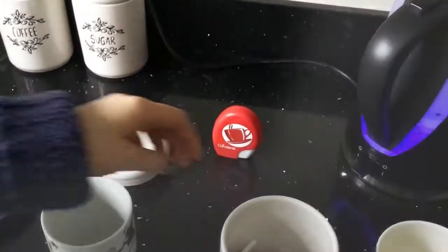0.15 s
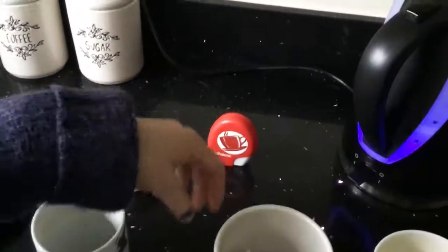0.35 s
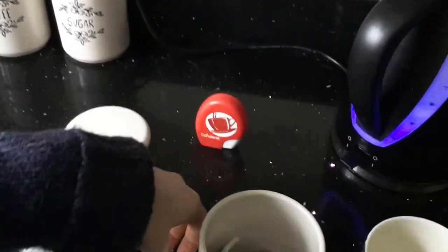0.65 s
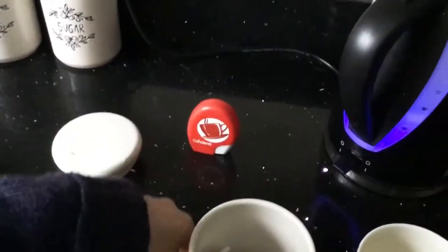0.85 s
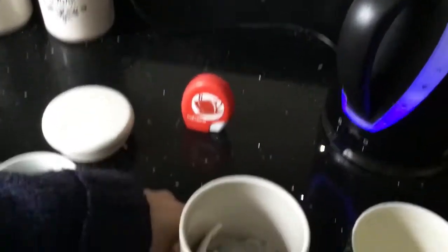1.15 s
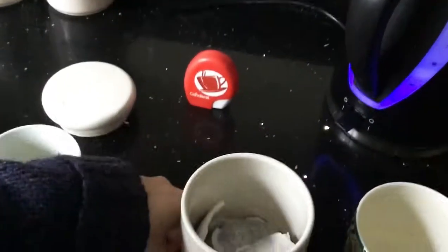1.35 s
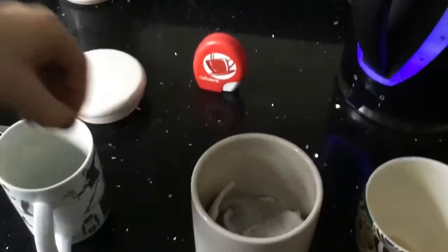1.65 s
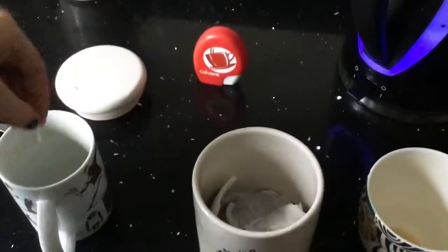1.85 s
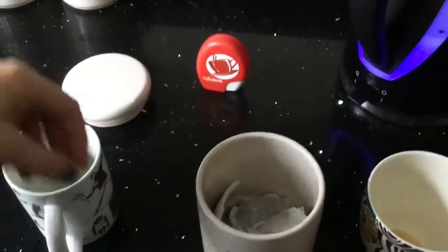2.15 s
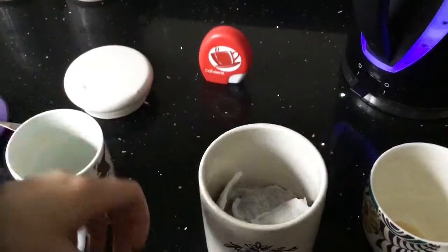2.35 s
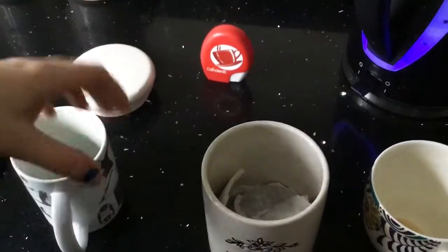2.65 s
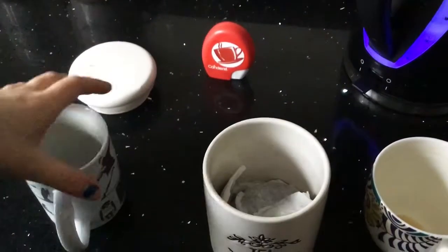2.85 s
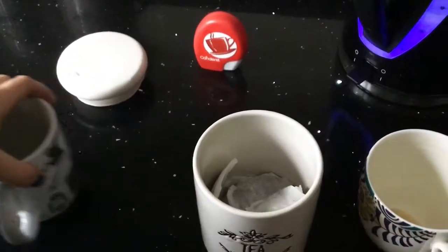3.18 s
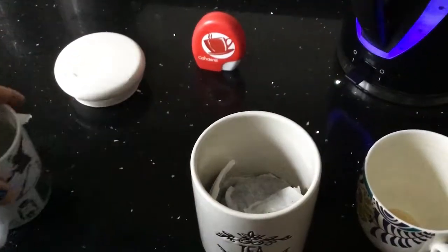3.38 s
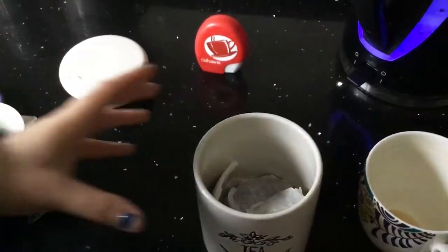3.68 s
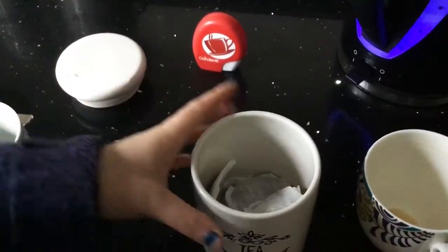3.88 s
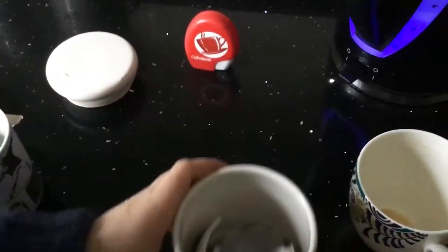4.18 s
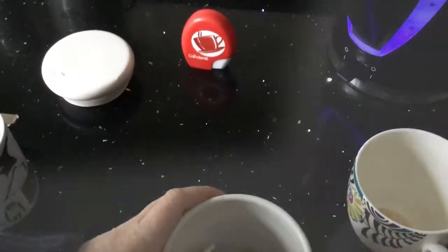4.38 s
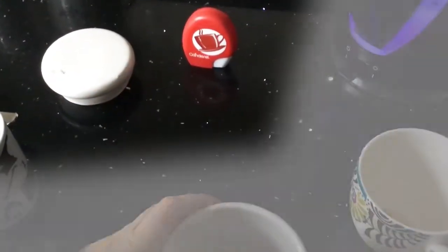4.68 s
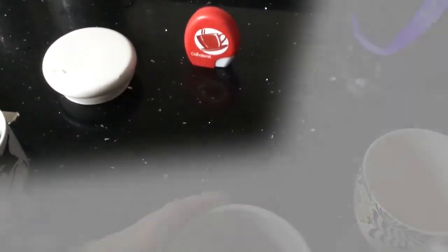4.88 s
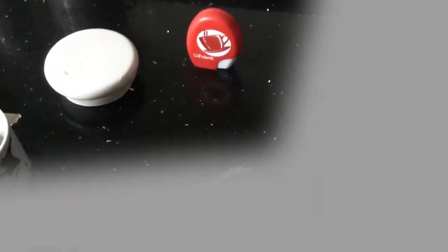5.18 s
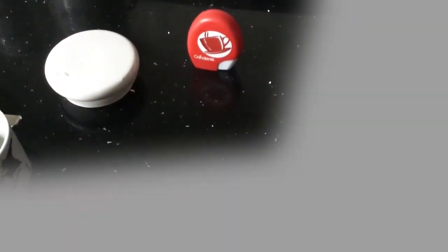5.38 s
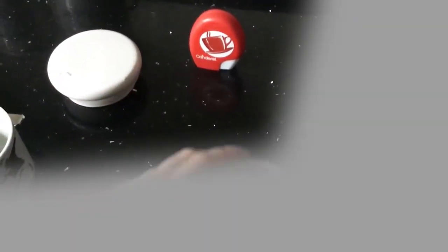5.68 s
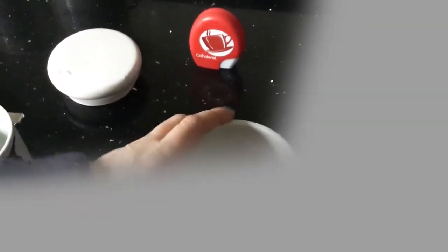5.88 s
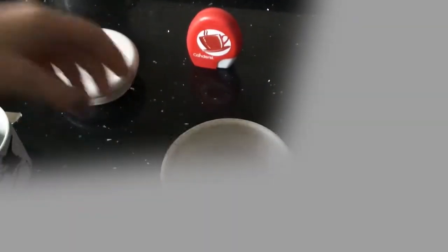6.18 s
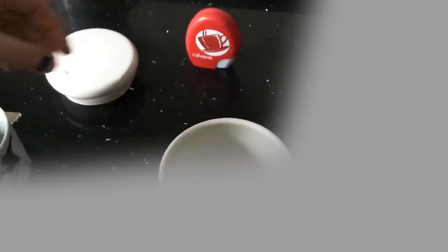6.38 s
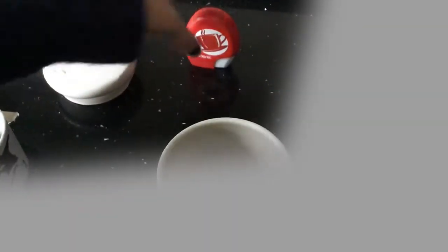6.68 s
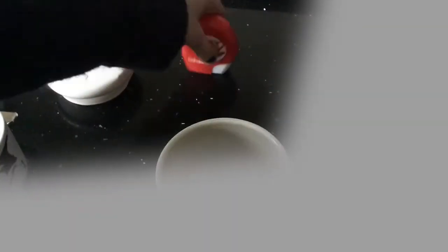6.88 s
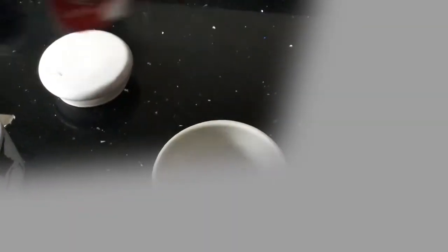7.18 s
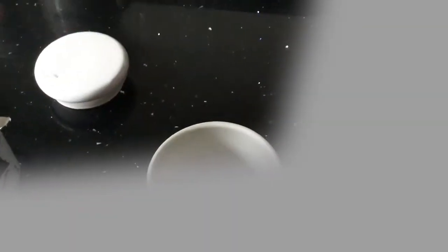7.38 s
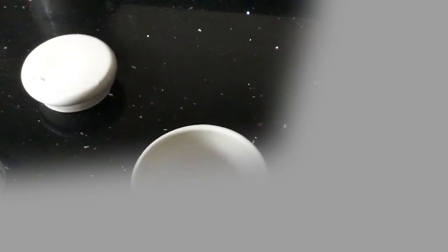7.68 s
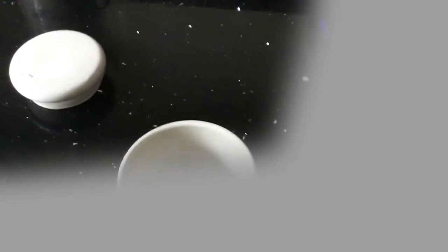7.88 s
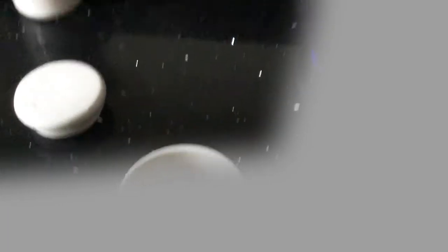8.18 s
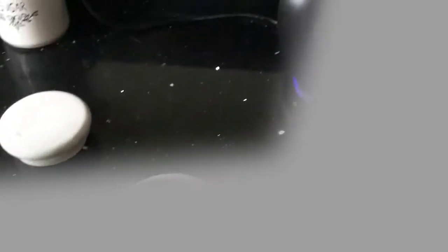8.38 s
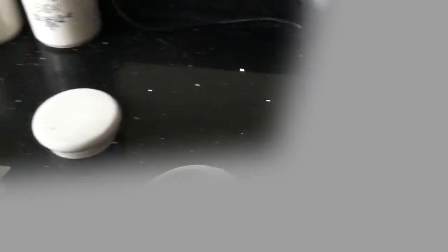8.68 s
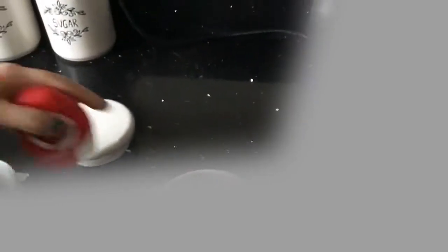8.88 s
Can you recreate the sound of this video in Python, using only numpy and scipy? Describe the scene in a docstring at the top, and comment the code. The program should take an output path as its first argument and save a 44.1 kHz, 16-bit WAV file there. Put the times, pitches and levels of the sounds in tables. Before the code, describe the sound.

Close on a stone kitchen worktop, an electric kettle fizzes and rumbles from the start, over a faint low hum. Light taps and a dull bump come around 0.6-0.8 s, then a rough, rattling ceramic jar knock at 1.3 s and a thin, high mug clink at 2.1 s. From about 2.6 s the bubbling rumble climbs steadily while the hiss fades. At 3.1-3.4 s a mug scrapes over the stone with a faint squeak; at 4.0-4.4 s a heavier jar grates and catches, and again, with a sharper knock, at 5.7-5.9 s. Single low bubble thuds appear from 4.8 s. After 6.2 s come soft finger pats and scuffs; from 6.9 s a hollow plastic dispenser clicks, crackles and rattles in the hand. Small hard clinks ring the mug brightly between 8.0 and 8.6 s, with plastic clicks continuing to about 9 s under the loud rumble. Short room reverberation.

```python
"""Kitchen worktop, with a faint hum: an electric kettle simmers, hisses and rumbles from the start (filtered pops).
Early taps, a bump and a rough jar knock come first, then a light clink on a mug (decaying modes).
The mug, then a ceramic tea jar, scrape over stone (stick-slip grit), as the rumble swells and the hiss fades.
Single low bubble thuds join in (short tones); a plastic dispenser is picked up, rubbed and clicked (resonated noise).
Last, small hard clinks ring the mug among the clicks."""
import sys
import numpy as np
from scipy import signal
from scipy.fft import rfft, irfft
from scipy.io import wavfile

SR = 44100
rng = np.random.default_rng(int(sys.argv[2]) if len(sys.argv) > 2 else 0)


def master(y):
    """Save y as 16-bit WAV."""
    cut = np.clip(np.atleast_2d(y).T, -1, 1)
    pcm = np.round(cut * 32767)  # scale
    wavfile.write(sys.argv[1], SR, pcm.astype(np.int16))


N = 399105
TIME = np.arange(N) / SR


def undb(db):
    """Decibels to gain."""
    return 10 ** (np.asarray(db) / 20)


def unit(x):
    """Scale to rms 1."""
    return x / np.sqrt(np.mean(x ** 2))


def peak_unit(x):
    """Scale to peak 1."""
    return x / np.abs(x).max()


def add(out, start_s, x):
    """Mix x into out at start_s."""
    i = max(int(start_s * SR), 0)
    out[i:i + len(x)] += x[:max(N - i, 0)]


def colour(x, points, size=4096):
    """Minimum-phase filter through (freq_hz, level_db) points."""
    hz, db = np.transpose(points)
    f = np.maximum(np.fft.rfftfreq(size, 1 / SR), 1)
    log_gain = np.log(undb(np.interp(np.log(f), np.log(hz), db)))
    cepstrum = irfft(log_gain)
    # Folding the cepstrum makes the filter causal.
    cepstrum[1:size // 2] *= 2
    cepstrum[size // 2 + 1:] = 0
    impulse = irfft(np.exp(rfft(cepstrum)))
    return signal.fftconvolve(x, impulse)[:len(x)]


def resonate(x, hz, width_hz):
    """Two-pole resonance, gain 1 at the centre."""
    return signal.lfilter(*signal.iirpeak(hz, hz / width_hz, fs=SR), x)


def resonate_twice(x, hz, width_hz):
    """Two equal resonances in series: steeper skirts."""
    return resonate(resonate(x, hz, width_hz), hz, width_hz)


def lowpass(x, order, cutoff_hz):
    """Butterworth low-pass."""
    return signal.sosfilt(signal.butter(order, cutoff_hz, fs=SR, output="sos"), x)


def walk(knots_per_s):
    """Random wander, straight between knots, with a spread near 1."""
    knots = rng.standard_normal(2000)
    return 1.2 * np.interp(TIME * knots_per_s, np.arange(len(knots)), knots)


def pops(rate_per_s, spread_db):
    """Random impulses of uneven size and sign, rms 1."""
    hit = rng.random(N) < rate_per_s / SR
    size = undb(spread_db * np.clip(rng.standard_normal(N), -2, 2))
    return unit(hit * size * rng.choice([-1, 1], N))


def gesture(start_s, length_s, attack_s, release_s):
    """Envelope of one movement: linear rise, hold, exponential decay."""
    rise = np.clip((TIME - start_s) / attack_s, 0, 1)
    return rise * np.exp(-np.clip((TIME - start_s - length_s) / release_s, 0, 20))


def ring(x, modes):
    """A pot's modes driven by x, rms 1; shorter t60 means a wider resonance."""
    return unit(sum(undb(db) * resonate(x, hz, 2.2 / t60_s) for hz, db, t60_s in modes))


def strike(modes, bright_db_per_octave, scatter_db, crack, crack_s):
    """One blow, peak 1: modes of randomly scattered level plus a noise crack through the same modes."""
    t = TIME[:SR // 3]
    hz, db, t60_s = np.transpose(modes)
    tilt_db = bright_db_per_octave * np.log2(hz / hz.mean())
    gain = undb(db + tilt_db + scatter_db * rng.standard_normal(len(hz)))
    onset = 1 - np.exp(-t / (crack_s / 6))  # a longer contact starts the ring more gently
    decaying = np.sin(2 * np.pi * hz[:, None] * t) * undb(-60 * t / t60_s[:, None])
    tones = onset * (gain @ decaying)
    burst = rng.standard_normal(len(t)) * np.exp(-t / crack_s)
    cracks = sum(g * resonate_twice(burst, f, f / 3) for f, g in zip(hz, gain))
    return peak_unit(tones + crack * cracks)


def kitchen(x, wet_db, t60_s=0.28):
    """Tiles and cupboards return a short, decaying noise tail."""
    t = TIME[:SR // 2]
    tail = rng.standard_normal(len(t)) * undb(-60 * t / t60_s) * (1 - np.exp(-t / 0.0011))
    tail = tail / np.sqrt(np.sum(tail ** 2))
    tail = colour(tail, [(200, -9), (2000, 5.0), (6000, -2.0), (15000, -6.5)])
    return x + undb(wet_db) * signal.fftconvolve(x, tail)[:N]


# room noise spectrum: freq_hz, level_db
FLOOR_COLOUR = [(25, -7.5), (40, 20), (60, 33), (120, 33), (500, 7), (3000, -5), (9000, -6), (15500, -19.5)]


def background():
    """A low wavering appliance hum (wandering phase and level) over faint room noise."""
    hum = np.sin(2 * np.pi * 56 * TIME + 0.41 * walk(7.7)) * undb(-68.0 + 1.7 * walk(3.2))
    return hum + unit(colour(rng.standard_normal(N), FLOOR_COLOUR)) * undb(-64.5)


# foot rings squeaking on high pot modes: start_s, length_s, level_db, pitch_hz
SQUEAKS = [(3.108, .11, -75.5, 5790), (3.16, .24, -78, 3375), (3.13, .27, -85, 14200),
           (3.15, .25, -86, 8530), (4.06, .33, -86, 9280), (5.69, .13, -82, 9280)]
SQUEAK_ATTACK_S, SQUEAK_RELEASE_S = 0.04, 0.05


def squeak():
    """Uneven stick-slip gives thin, faltering tones that swell and fade with each push."""
    waver_rad = .8 * walk(55)
    flutter = undb(3 * walk(40))
    tones = 0
    for start_s, length_s, db, hz in SQUEAKS:
        push = gesture(start_s, length_s, SQUEAK_ATTACK_S, SQUEAK_RELEASE_S)
        tones = tones + undb(db) * np.sin(2 * np.pi * hz * TIME + waver_rad) * push
    return flutter * tones


# scrape spectrum: freq_hz, level_db
SCRAPE_COLOUR = [(300, -9), (620, 17), (850, 10), (1080, 11.5), (1450, -10), (1800, -15), (2400, -23),
                 (5000, -42), (15000, -49)]


def slide(modes, sing_db, soft_hz):
    """An unglazed foot ring catches and slips on the stone; the pot's lower modes sing along."""
    grit = pops(700, 4.5) * undb(3 * walk(45))
    singing = ring(lowpass(grit, 6, soft_hz), modes)
    return unit(unit(colour(grit, SCRAPE_COLOUR)) + singing * undb(sing_db))


# pots sliding on stone: start_s, fastest_s, stop_s, reference_db (2.75 dB above fastest), pot
SLIDES = [(3.13, 3.26, 3.40, -51.5, "mug"), (4.06, 4.11, 4.14, -49, "jar"),
          (4.16, 4.24, 4.40, -50.5, "jar"), (5.67, 5.71, 5.76, -56, "jar"), (5.765, 5.79, 5.90, -48, "jar")]
# foot rings catching on the stone: start_s, peak_db
CATCHES = [(3.107, -47), (4.02, -40), (4.098, -39), (4.23, -44.5), (4.273, -46), (4.312, -50), (4.353, -46),
           (5.775, -39.5), (5.7887, -32.5), (5.823, -42), (5.853, -47)]
# jar rocking on its foot ring: freq_hz, level_db, t60_s
FOOT_MODES = [(530, -1, .04), (610, 3, .04), (690, 3, .04), (790, -2, .04), (1025, 4, .1), (1210, -4, .07),
              (1750, -4, .11), (2045, -12, .09), (2355, -18, .08)]
# spectrum of a dull catch: freq_hz, level_db
FOOT_CONTACT_COLOUR = [(300, -10), (550, 5), (1000, -3), (1800, -1), (2600, -9.5), (8000, -37)]
SLIDE_SWELL_DB = 5.5  # rise from first movement to full speed
SLIDE_EDGE_S = .022  # attack and release
CATCH_DECAY_S, CATCH_RING_DB = 0.0088, -3


def slides():
    """Mug, then jar, scrape louder with speed; each catch is a sudden release plus grinding."""
    scrape = {
        "mug": slide(MUG_MODES, sing_db=-21, soft_hz=3400),
        "jar": slide(FOOT_MODES, sing_db=6, soft_hz=2000),
    }
    out, t = np.zeros(N), TIME[:SR // 6]
    for start_s, fastest_s, stop_s, db, pot in SLIDES:
        speed = np.interp(TIME, [start_s, fastest_s, stop_s], [0, 1, 0])
        envelope = gesture(start_s, stop_s - start_s, SLIDE_EDGE_S, SLIDE_EDGE_S)
        out += scrape[pot] * envelope * undb(db - SLIDE_SWELL_DB * (1.5 - speed))
    for start_s, db in CATCHES:
        push = rng.standard_normal(len(t)) * np.exp(-t / CATCH_DECAY_S)
        push[0] += 8  # sudden release ahead of the grinding
        rocking = ring(colour(push, FOOT_CONTACT_COLOUR), FOOT_MODES)
        clunk = unit(colour(push, SCRAPE_COLOUR)) + undb(CATCH_RING_DB) * rocking
        add(out, start_s, undb(db) * peak_unit(clunk))
    return out


# jar knocks: start_s, peak_db, bright_db_per_octave
KNOCKS = [(1.3163, -40, 3.5), (1.3281, -29.5, -7.5), (1.333, -37.5, -5), (3.314, -42, -10.5),
          (3.345, -50, -9), (5.763, -48.5, -9)]
# dull worktop bumps: start_s, level_db, pitch_hz
BUMPS = [(0.8202, -23.5, 270)]
# tea jar: freq_hz, level_db, t60_s
JAR_MODES = [(641, -11, .13), (1030, -18, .06), (1357, -2, .07), (1615, -2, .065), (1830, -6, .04),
             (1950, -8, .04), (2186, -7, .05), (2485, 0, .035), (3070, -10, .05), (3780, 1, .045),
             (4440, -1, .03), (5050, -3, .03), (5640, -4, .035), (6500, -22, .03), (9280, -30, .08),
             (15000, -17, .04)]


def crockery():
    """A rough contact rings the jar's modes; a worktop bump is a low tone under a short swell."""
    out, t = np.zeros(N), TIME[:SR // 10]
    for start_s, db, bright_db in KNOCKS:
        knock = strike(JAR_MODES, bright_db, scatter_db=1.5, crack=4.5, crack_s=.006)
        add(out, start_s, undb(db) * knock)
    swell = t / 0.0031
    for start_s, db, hz in BUMPS:
        add(out, start_s, undb(db) * np.cos(2 * np.pi * hz * t) * (swell * np.exp(1 - swell)) ** 2)
    return out


# jar chattering after a knock: start_s, length_s, level_db
RATTLES = [(1.341, 0.026, -55), (3.325, .035, -67.5)]
# chatter spectrum: freq_hz, level_db
RATTLE_COLOUR = [(900, -29), (1500, 2), (2400, -4), (3000, -1), (3800, -5.5), (5700, -7), (7000, -14),
                 (9000, -18), (11000, -35), (16000, -30)]
RATTLE_ATTACK_S, RATTLE_RELEASE_S, RATTLE_PER_S = 0.011, 0.076, 2200


def rattle():
    """After a knock the foot ring chatters in dense, fading bounces that keep the jar ringing."""
    chatter = unit(colour(pops(RATTLE_PER_S, 2.5), RATTLE_COLOUR))
    chatter = unit(chatter + .45 * ring(chatter, JAR_MODES))
    gain = sum(undb(db) * gesture(start_s, length_s, RATTLE_ATTACK_S, RATTLE_RELEASE_S)
               for start_s, length_s, db in RATTLES)
    return chatter * gain


# light hard blows: start_s, peak_db, middle_modes_db, top_modes_db, ring_share (of t60), click_db (re peak_db)
CLINKS = [(2.06, -31.5, -3, 18, 0.78, -25), (8.0291, -24, 0, -1, 1.02, -1),
          (8.1904, -27, -7, -18, 1.03, -14), (8.2508, -41, -11, -11, 0.91, -9),
          (8.4824, -22, -9, 2, 0.86, -10), (8.527, -31, -10, -14, 0.93, -9), (8.596, -34, -6, 6, 1.06, -14)]
# mug: freq_hz, level_db, t60_s
MUG_MODES = [(3316, -34, .15), (3386, -30, .15), (4480, -35, .06), (4797, -30, .1), (5790, -25, .09),
             (5845, -26, .07), (8511, -12, .22), (8548, 3, .11), (8590, -6, .04), (8695, -2, .18),
             (8870, -19, .08), (9836, -14, .2), (10270, -23, .11), (10912, -14, .1), (12450, -12, .09),
             (12600, -20, .12), (12690, -21, .12), (12955, -21, .13), (14180, -7, .1), (14380, -17, .05),
             (14560, -21, .05)]
# spectrum of the hard contact: freq_hz, level_db
CLICK_COLOUR = [(1500, -17), (5000, -20), (8500, -4), (11000, -17), (15000, -6)]
CLICK_DECAY_S = 0.001


def clinks():
    """Small hard things, a spoon or a tablet, click and ring the mug; each spot favours other modes."""
    out, t = np.zeros(N), TIME[:SR // 10]
    hz, mode_db, t60_s = np.transpose(MUG_MODES)
    middle, top = (hz > 9400) & (hz < 13400), hz > 13400
    for start_s, db, middle_db, top_db, ring_share, click_db in CLINKS:
        spot_db = mode_db + middle_db * middle + top_db * top
        modes = np.transpose([hz, spot_db, t60_s * ring_share])
        add(out, start_s, undb(db) * strike(modes, 0, scatter_db=1, crack=0, crack_s=.001))
        click = colour(rng.standard_normal(len(t)) * np.exp(-t / CLICK_DECAY_S), CLICK_COLOUR)
        add(out, start_s, undb(db + click_db) * peak_unit(click))
    return out


def shifting(x, knots_per_s, depth_db):
    """The contact point moves, so each band comes and goes on its own."""
    centres_hz = np.geomspace(900, 13000, 9)
    bands = (unit(resonate_twice(x, hz, hz / 2)) * np.sqrt(hz) for hz in centres_hz)
    return unit(sum(undb(depth_db * walk(knots_per_s)) * band for band in bands))


def grains(rate_per_s):
    """Tiny catches, each ringing briefly at one of 36 pitches; the rate is per pitch."""
    centres_hz = np.geomspace(1100, 15000, 36)
    bands = (unit(resonate_twice(pops(rate_per_s, 3.5), hz, 200 + hz / 25)) * np.sqrt(hz)
             for hz in centres_hz)
    return unit(sum(bands))


# hollow plastic case: freq_hz, width_hz, doubled_level_db (halved when played)
CASE_MODES = [(1376, 53, 0), (2350, 140, 6.5), (2940, 240, 0), (3780, 110, -10), (4180, 57, -4),
              (4760, 390, -1), (6600, 130, -6)]
CASE_RING_DB = -7


def hollow(x):
    """Friction on the plastic case, coloured by its resonances, rms 1."""
    ringing = sum(undb(db / 2) * resonate(x, hz, width_hz) for hz, width_hz, db in CASE_MODES)
    return unit(unit(x) + undb(CASE_RING_DB) * unit(ringing))


# finger and sleeve strokes: start_s, length_s, scuff_db, crackle_db
STROKES = [(0.6, 0.087, -72, -69), (6.192, 0.074, -68, -81), (6.73, 0.084, -65.5, -88),
           (6.967, 0.071, -70, -58.5), (7.063, 0.13, -64.5, -65), (7.292, 0.047, -72, -68),
           (7.364, 0.12, -64, -66), (7.648, 0.06, -57, -57.5), (7.776, 0.12, -64.5, -62),
           (7.998, 0.046, -60, -69), (8.134, 0.059, -56.5, -57.5), (8.26, 0.073, -61.5, -61.5),
           (8.596, 0.083, -61.5, -73), (8.708, 0.062, -67, -69), (8.812, 0.032, -60.5, -69),
           (8.988, 0.034, -73, -67)]
# dull scuff spectrum: freq_hz, level_db
SCUFF_COLOUR = [(600, -14), (1050, -8.5), (1400, 0), (1750, 5.5), (2250, 3), (2700, -4), (3300, -5),
                (4200, -8), (7000, -28), (16000, -33)]
# bright crackle spectrum: freq_hz, level_db
RUSTLE_COLOUR = [(800, -1.5), (2000, -12), (3400, -10), (4900, -9.5), (5800, -9.5), (7000, -13.5),
                 (9000, -12), (11000, -22), (16000, -17)]
STROKE_ATTACK_S, STROKE_RELEASE_S = 0.013, 0.0054
HELD_FROM_S, GRIP_SCUFF_DB, GRIP_CRACKLE_DB = 6.9, -72.5, -75.5


def rubbing():
    """Fingers scuff the hollow case; sleeve and nails add a bright crackle of tiny catches."""
    drags = shifting(pops(800, 3.5) * undb(1.5 * walk(110)), knots_per_s=60, depth_db=3)
    catches = (grains(rate_per_s=330) + .4 * pops(4000, 3)) * undb(1.8 * walk(120))
    scuff = hollow(colour(drags, SCUFF_COLOUR))
    crackle = hollow(colour(catches, RUSTLE_COLOUR))
    grip = (HELD_FROM_S, TIME[-1] - HELD_FROM_S, GRIP_SCUFF_DB, GRIP_CRACKLE_DB)
    scuff_gain = crackle_gain = 0
    for start_s, length_s, scuff_db, crackle_db in STROKES + [grip]:
        pressure = gesture(start_s, length_s, STROKE_ATTACK_S, STROKE_RELEASE_S)
        scuff_gain = np.maximum(scuff_gain, pressure * undb(scuff_db))
        crackle_gain = np.maximum(crackle_gain, pressure * undb(crackle_db))
    return scuff * scuff_gain + crackle * crackle_gain


# soft fingertip pats: start_s, peak_db, centre_hz
PATS = [(6.206, -53.5, 2640), (6.601, -46, 2060), (6.673, -45.5, 2130), (6.922, -50, 1800),
        (7.378, -50.5, 1650), (7.546, -53, 2450), (7.615, -49.5, 2460), (7.99, -51, 1970),
        (8.365, -51, 2360), (8.471, -47.5, 2320), (8.726, -45, 2370), (8.768, -49, 2130)]
PAT_RISE_S, PAT_WIDTH_HZ = 0.005, 480


def pats():
    """A fingertip lands softly: slow-rising noise, one case resonance and a scuff."""
    out, t = np.zeros(N), TIME[:SR // 10]
    for start_s, db, hz in PATS:
        contact = rng.standard_normal(len(t)) * t * np.exp(-t / PAT_RISE_S)
        case = unit(resonate_twice(contact, hz, PAT_WIDTH_HZ))
        pat = case + undb(2.5) * unit(colour(contact, SCUFF_COLOUR))
        add(out, start_s, undb(db) * peak_unit(pat))
    return out


GRIP_TICK_DB, GRIP_TICK_HZ = -58, 3200  # middle of the random range


def grip_ticks(count):
    """Faint taps of the shifting grip at chance times, strengths and spots: rows like TAPS."""
    held_s = TIME[-1] - HELD_FROM_S
    return [(HELD_FROM_S + when * held_s, GRIP_TICK_DB + 8 * (force - .5),
             GRIP_TICK_HZ * 2 ** (spot - .5), -7)
            for when, force, spot in rng.random((count, 3))]


# plastic clicks and nail taps: start_s, peak_db, centre_hz, snap_db (broadband, re case)
TAPS = [(0.653, -47, 3420, -16), (0.819, -41, 1770, -11), (5.593, -42, 4160, 3), (6.652, -52, 2060, -12),
        (6.8843, -54.5, 3940, 0), (6.9362, -39, 1750, -5), (6.977, -42.5, 1300, -2), (7.0119, -37, 4270, 4),
        (7.028, -49, 3800, -1), (7.0657, -44, 4760, 7), (7.1157, -45, 5600, 2), (7.1414, -39, 3160, 6),
        (7.1748, -41, 2920, 6), (7.2105, -43, 4500, -2), (7.3083, -48, 3420, 6), (7.402, -46, 4400, -7),
        (7.4436, -47, 3400, -7), (7.4549, -40.5, 4340, -9), (7.486, -48, 4430, -3), (7.6589, -48, 1840, -4),
        (7.668, -40, 3400, 17), (7.688, -37.5, 1700, -14), (7.7017, -34, 3530, 2),
        (7.7483, -40.5, 3800, -3), (7.7812, -45, 3180, 2), (8.1514, -49, 4250, 8), (8.1765, -39, 5330, 1),
        (8.195, -41, 2130, 2), (8.2645, -46, 4970, 6), (8.578, -51, 5100, -3), (8.6142, -37, 3700, -2),
        (8.6566, -42.5, 4600, 1), (8.681, -49, 3230, 2), (8.722, -42, 2640, 9), (8.865, -44, 4630, 1),
        (8.98, -51, 4540, -1), (9.0134, -47, 2980, -7), (9.035, -45, 4340, 3)]
# plastic snap spectrum: freq_hz, level_db
PLASTIC_COLOUR = [(400, -8), (1000, 5), (1400, -4), (2400, -1.5), (4800, 5.5), (6500, -3.5), (10000, -6),
                  (16000, -28)]


def dispenser():
    """Plastic snaps die in milliseconds; each spot of the case has its own pitch and few modes."""
    out, t = np.zeros(N), TIME[:SR // 10]
    for start_s, db, hz, snap_db in TAPS + grip_ticks(count=8):
        contact = rng.standard_normal(len(t)) * (np.exp(-t / .0025) + .1 * np.exp(-t / .012))
        detune = 1 + .05 * rng.standard_normal(4)
        modes_hz = np.minimum(hz * np.geomspace(.65, 1.3, 4) * detune, .4 * SR)
        case = sum(resonate_twice(contact, f, 520) for f in modes_hz)
        tap = unit(case) + undb(snap_db) * unit(colour(contact, PLASTIC_COLOUR))
        add(out, start_s, undb(db) * peak_unit(tap))
    return out


# bubble ticks on the kettle wall: centre_hz, width_hz (each of two filters), rate_per_s, level_db
WALL_TICKS = [(2210, 240, 34, -84), (3400, 1500, 5, -89)]


def wall_ticks():
    """Single small bubbles tick against the kettle wall."""
    return sum(undb(db) * unit(resonate_twice(pops(rate_per_s, 2.2), hz, width_hz))
               for hz, width_hz, rate_per_s, db in WALL_TICKS)


# large bubbles collapsing on the hot plate: start_s, level_db, pitch_hz
THUDS = [(4.777, -29.5, 200), (5.327, -30, 225), (5.367, -26.5, 225), (6.706, -23, 208), (7.813, -20, 223),
         (7.859, -21, 232), (8.42, -21, 205), (8.678, -27, 177)]
THUD_RISE_S = 0.0074


def thuds():
    """The largest bubbles collapse alone, a few low cycles each."""
    out, t = np.zeros(N), TIME[:SR // 10]
    swell = t / THUD_RISE_S
    for start_s, db, hz in THUDS:
        add(out, start_s, undb(db) * np.sin(2 * np.pi * hz * t) * (swell * np.exp(1 - swell)) ** 2)
    return out


# surges of larger bubbles: start_s, length_s, rise_db (over the rumble)
SURGES = [(0.76, 0.41, 1.5), (5.3, 0.43, 2)]
SURGE_ATTACK_S, SURGE_RELEASE_S = 0.17, 0.026
RUMBLE_DB, SWELL_FROM_S, SWELL_DB_PER_S = -42, 2.58, 1.3659  # level before the low-pass


def rumble_level():
    """Gain of the rumble: level, then a steady climb in dB as the boil nears, with brief surges."""
    surges_db = sum(db * gesture(start_s, length_s, SURGE_ATTACK_S, SURGE_RELEASE_S)
                    for start_s, length_s, db in SURGES)
    return undb(RUMBLE_DB + SWELL_DB_PER_S * np.maximum(TIME - SWELL_FROM_S, 0) + surges_db)


# kettle body and water: freq_hz, base_width_hz (widened when played), level_db
BODY_MODES = [(78.4, 5.3, -20.5), (99.7, 6.2, -30), (119.2, 10.1, -5), (134.4, 41, -12.5),
              (144.4, 8.5, -8.5), (162.8, 8.6, -0.5), (196.7, 13.7, -1), (219.4, 27.8, 0), (241.4, 19.8, 1),
              (263.7, 9.2, -12), (292.4, 23.3, -10.5), (352.4, 20.5, -15), (522.5, 43, -21)]
# simmer spectrum: freq_hz, level_db
SIMMER_COLOUR = [(250, -22), (320, 2.5), (352, 14), (400, 3), (440, -1.5), (480, 0.5), (520, 2),
                 (600, -5.5), (705, 4.5), (790, -0.5), (890, -12), (1100, -44)]
# fizz spectrum: freq_hz, level_db
FIZZ_COLOUR = [(600, 8), (950, 6), (1180, 4.5), (1350, 6), (2000, -1), (3800, -1.5), (5000, -7.5),
               (6500, -18.5), (10000, -26.5), (16000, -41)]
RUMBLE_TOP_HZ = 870
# As the water warms, bubbles live longer: simmer sinks steadily, fizz decays to a rest level.
SIMMER_DB, SIMMER_FALL_DB_PER_S = -47, 1.0
FIZZ_START_DB, FIZZ_REST_DB, FIZZ_FADE_S = -55.5, -71.5, 3.29


def kettle():
    """Big bubbles thump the body, one pop train per mode; middling ones simmer, tiny ones fizz."""
    body = 0
    for hz, width_hz, db in BODY_MODES:
        thumps = pops(700, 3.14)  # bubbles at different places on the hot plate reach different modes
        body = body + undb(db) * resonate_twice(thumps, hz, 1.84 * width_hz)
    lone = resonate_twice(pops(14, 3), 215, 110)  # now and then one stands out
    rumble = unit(unit(body) + undb(-11.5) * unit(lone)) * rumble_level()
    rumble = lowpass(rumble, 2, RUMBLE_TOP_HZ)

    simmer_db = SIMMER_DB - SIMMER_FALL_DB_PER_S * TIME
    simmer = unit(colour(pops(1800, 1.3), SIMMER_COLOUR)) * undb(simmer_db)

    fizz = unit(colour(pops(6000, 1.4), FIZZ_COLOUR))
    fizz = fizz + ring(fizz, JAR_MODES) * undb(-25.0)  # the open jar colours the hiss like a seashell
    fizz_db = FIZZ_REST_DB + (FIZZ_START_DB - FIZZ_REST_DB) * np.exp(-TIME / FIZZ_FADE_S)
    return rumble + simmer + unit(fizz) * undb(fizz_db + 0.53 * walk(26))


def scene():
    """Kettle and handling on one worktop; handling and knocks get the room tail."""
    handling = clinks() + dispenser() + pats() + rubbing() + slides() + rattle() + squeak()
    near = kitchen(handling, wet_db=-9)
    boiling = kettle() + thuds() + wall_ticks()
    return (boiling + near + kitchen(crockery(), wet_db=-8) + background())[None]


TOP_HZ = 15850


def record(dry):
    """The microphone drops the deepest bass and the very top."""
    dry = signal.sosfilt(signal.butter(4, 40, "high", fs=SR, output="sos"), dry)
    return signal.sosfilt(signal.ellip(10, .2, 80, TOP_HZ, fs=SR, output="sos"), dry)


dry = scene()
out = record(dry)
master(out)
```